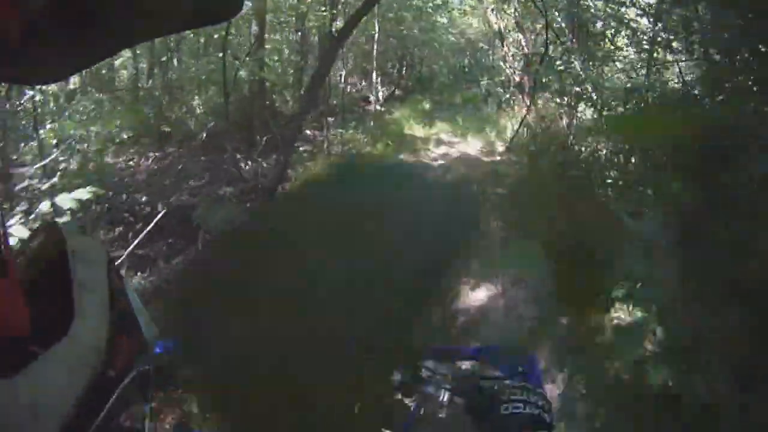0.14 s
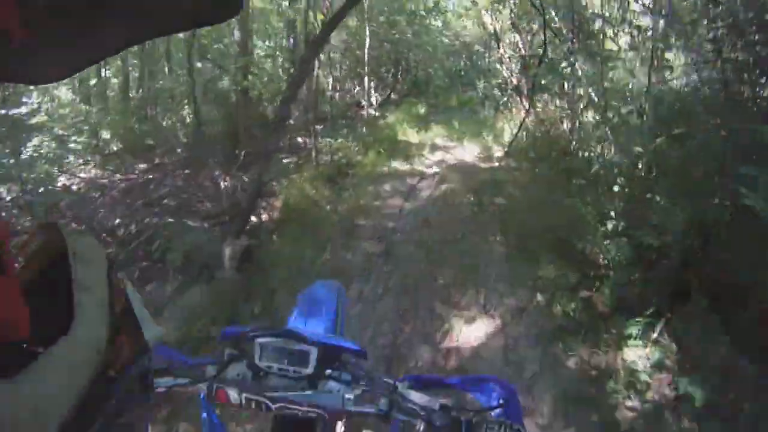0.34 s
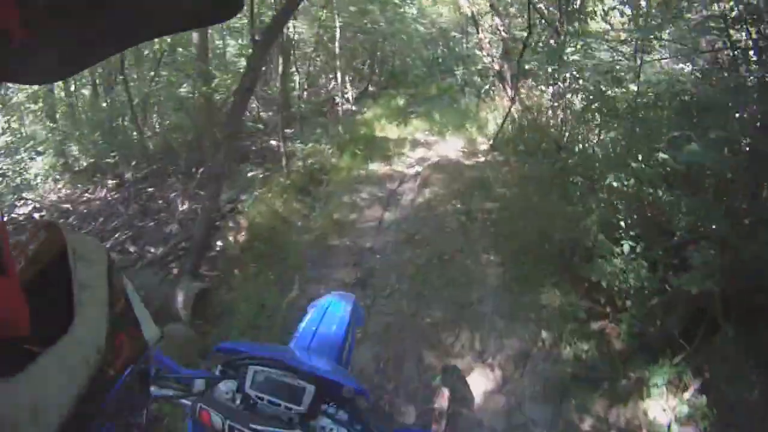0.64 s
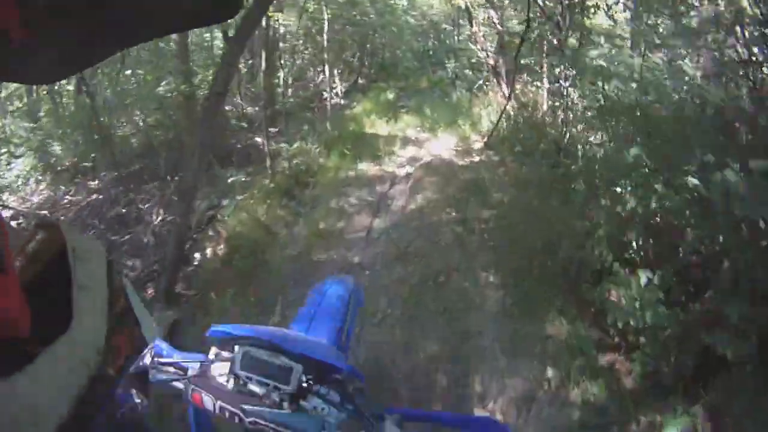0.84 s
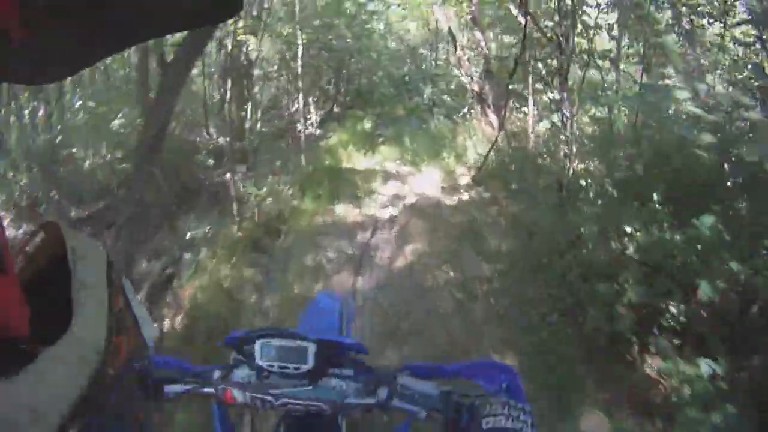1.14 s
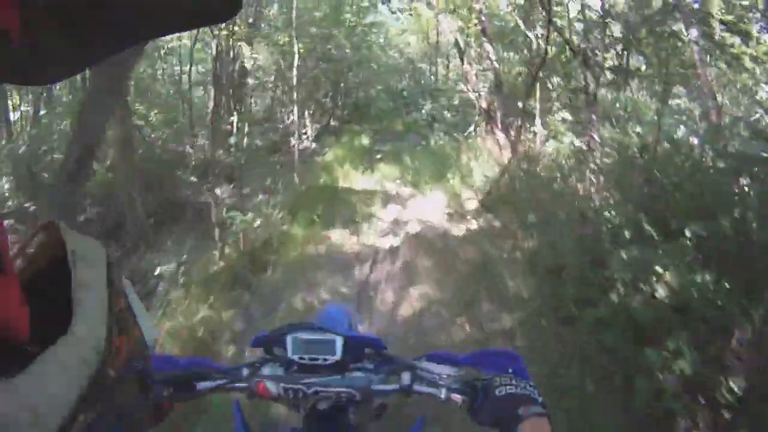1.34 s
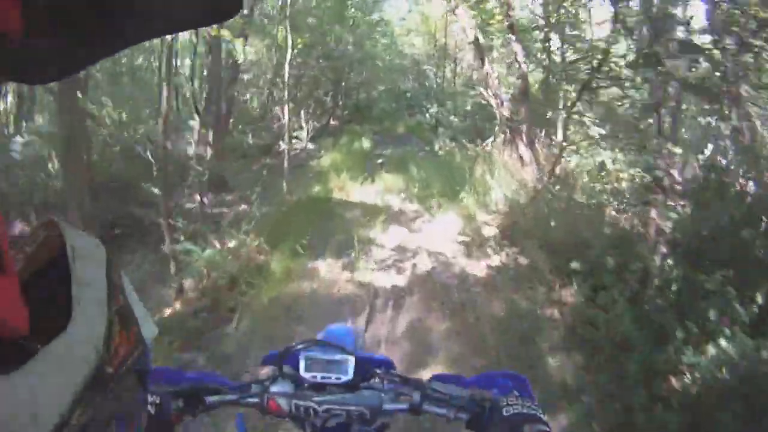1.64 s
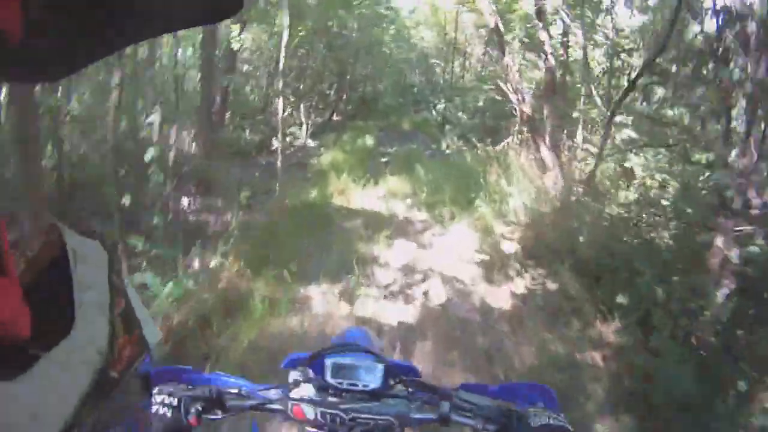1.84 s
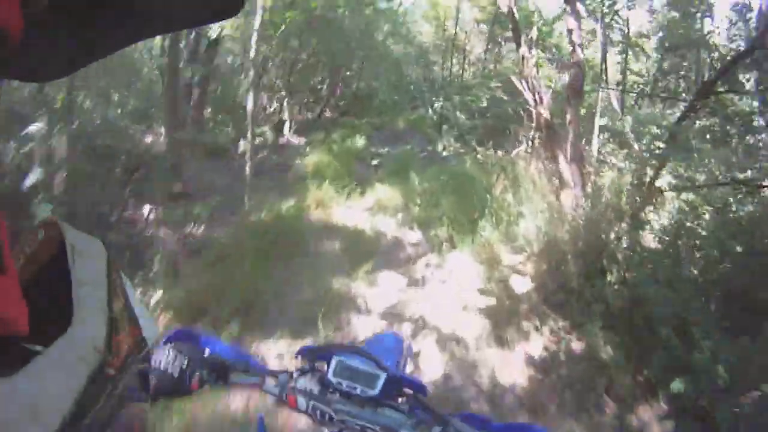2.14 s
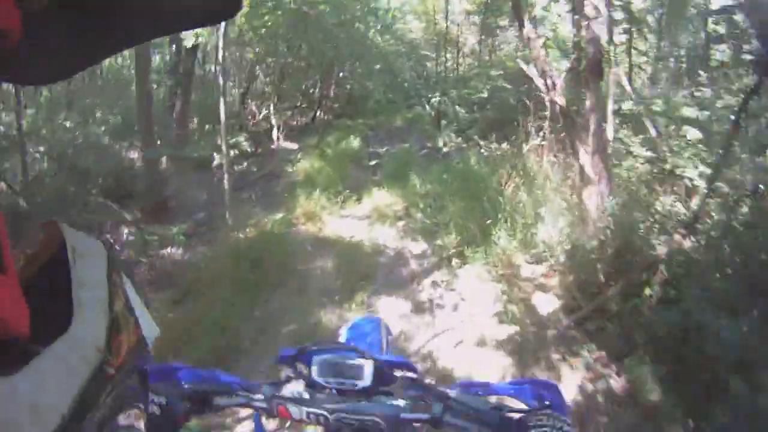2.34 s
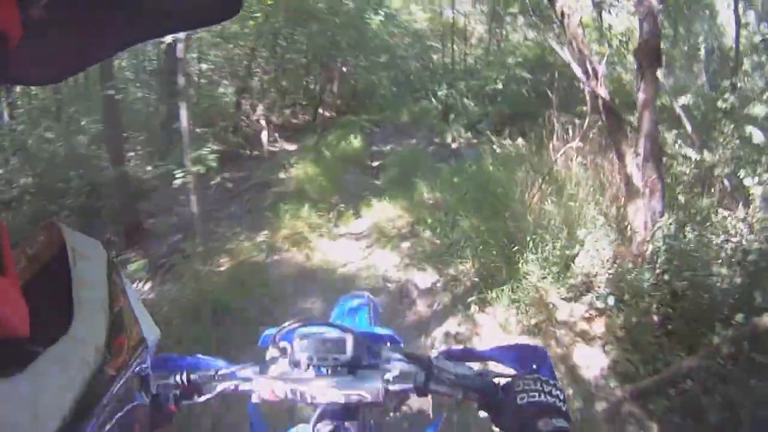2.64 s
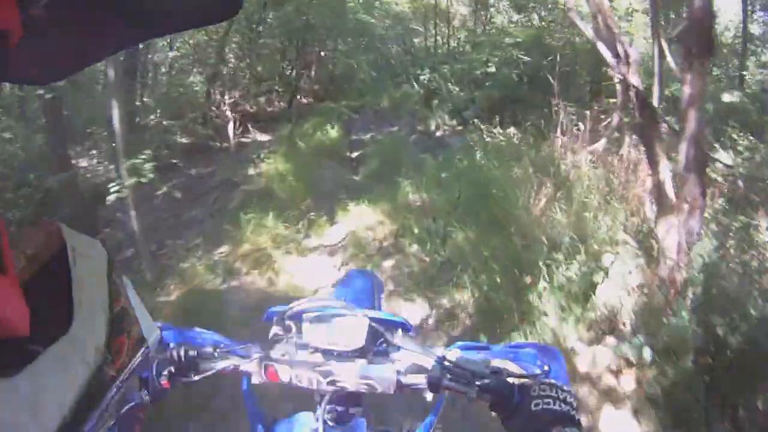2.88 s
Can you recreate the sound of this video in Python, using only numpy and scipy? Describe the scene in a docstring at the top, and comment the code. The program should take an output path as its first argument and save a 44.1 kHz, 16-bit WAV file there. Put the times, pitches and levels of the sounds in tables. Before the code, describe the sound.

A dirt bike engine, heard close at the rider's helmet on a wooded trail: hard plastic knocks, a quick overloaded rev, then a fall to a slow putter with missed beats and faint brake hiss.

```python
"""A single-cylinder four-stroke dirt bike on a forest trail, heard by a microphone at the rider's helmet.
First the chassis clatters over a bump in noise bursts, as the throttle opens and the airbox rings.
The loud part overloads the microphone: each firing rings the silencer and echoes in the exhaust pipe.
Then the engine sinks to a putter and misses a few firings, while a narrow band of noise hisses at the brake.
Noise for gas rasp, engine clatter and tyre rumble runs throughout; short dull bumps (decaying sines) and
bright swishes of brush (noise swells) come both early and late."""
import sys
import numpy as np
from scipy import signal
from scipy.fft import rfft, irfft
from scipy.io import wavfile
from scipy.ndimage import uniform_filter1d

SR = 44100
rng = np.random.default_rng(int(sys.argv[2]) if len(sys.argv) > 2 else 0)


def dump(signal):
    """Clip the signal to [-1, 1] and save it as 16-bit WAV at the path in sys.argv[1]."""
    limited = np.clip(np.atleast_2d(signal).T, -1, 1)
    pcm = np.round(limited * 32767).astype(np.int16)
    wavfile.write(sys.argv[1], SR, pcm)


N = 132741
TIME = np.arange(N) / SR


def from_db(db):
    """Decibels to gain."""
    return 10 ** (np.asarray(db) / 20)


def curve(rows, at=TIME):
    """The columns of a control curve, interpolated at the given times."""
    start_s, *columns = np.transpose(rows)
    return [np.interp(at, start_s, column) for column in columns]


def clicks(times, sizes):
    """A train of single-sample impulses, over a tiny offset far below hearing."""
    positions = np.maximum(times * SR, 0).astype(int)
    return np.bincount(positions, sizes, N)[:N] + 1e-18


def ring(x, hz, t60):
    """A unit click sets a sine of height 1 ringing, which falls 60 dB in t60 seconds."""
    radius = from_db(-60 / (t60 * SR))
    angle = 2 * np.pi * hz / SR
    return signal.lfilter([0, np.sin(angle)], [1, -2 * radius * np.cos(angle), radius ** 2], x)


def fade(x, decay_s):
    """Each click becomes an exponential decay."""
    return signal.lfilter([1], [1, -np.exp(-1 / (decay_s * SR))], x)


# hollow resonances around the microphone: centre_hz [Hz], width_hz [Hz], boost_db [dB]
HOLLOW_RESONANCES = [(1440, 110, 8), (1857, 43, 8), (3085, 69, 9), (4750, 150, 4), (5870, 490, 6.5)]


def noise(colour):
    """Noise of the given colour, heard through the hollow resonances; rms 1."""
    hz = np.fft.rfftfreq(N, 1 / SR) + 1  # the offset keeps the logarithm finite
    point_hz, point_db = np.transpose(colour)
    gain_db = np.interp(np.log(hz), np.log(point_hz), point_db)
    for centre_hz, width_hz, boost_db in HOLLOW_RESONANCES:
        gain_db = gain_db + boost_db / (1 + (2 * (hz - centre_hz) / width_hz) ** 2)
    x = irfft(rfft(rng.standard_normal(N)) * from_db(gain_db), N)
    return x / x.std()


# crank speed: start_s [s], speed_rpm [revolutions per minute]
CRANK_SPEED = [(0.0, 2086), (0.153, 2391), (0.418, 5474), (0.521, 6039), (0.655, 5859), (0.881, 4474),
               (1.01, 3995), (1.138, 3725), (1.335, 3459), (1.36, 3169), (1.463, 1965), (1.511, 2143),
               (1.76, 2101), (1.799, 2006), (1.968, 2336), (2.167, 2234), (2.303, 2106), (2.433, 2302),
               (2.577, 1954), (2.613, 2352), (2.754, 2211), (3.01, 2250)]
# weak or missed firings, each given to the nearest firing: start_s [s], loss_db [dB]
WEAK_FIRINGS = [(1.407, -5), (1.459, -11), (1.573, -8.5), (2.019, -3.5), (2.071, -3.5), (2.177, -4),
                (2.232, -18)]
FIRST_FIRING_CYCLES = .245


def crank():
    """Engine cycles gone by (two turns each), the firing times and how much each falls short in dB."""
    cycles = np.cumsum(curve(CRANK_SPEED)[0]) / (120 * SR) - FIRST_FIRING_CYCLES
    times = np.interp(np.arange(int(cycles[-1]) + 1), cycles, TIME)
    loss_db = np.zeros(len(times))
    for start_s, db in WEAK_FIRINGS:
        loss_db[np.argmin(abs(times - start_s))] = db
    return cycles, times, loss_db


# strength of the firings: start_s [s], level_db [dB]
FIRING_STRENGTH = [(0, -3), (.12, 1), (.22, 4.5), (.29, 5), (.38, 0.5), (.55, 1.5), (.76, -1), (.95, 3),
                   (1.12, 5), (1.31, 4.5), (1.38, -2.5), (1.55, -0.5), (1.76, -4.5), (1.88, -1.5),
                   (2.28, -3.5), (2.4, 0.5), (2.51, 0), (2.62, 1), (3, 2)]
# hot gas shortens the echo in the pipe, load sharpens the pulse:
# start_s [s], round_trip_ms [ms], bark_db [dB]
PIPE_STATE = [(0, 7, -13), (.25, 6.6, 0), (.48, 4.57, 9.5), (.7, 4.85, 10.5), (.95, 6.35, -0.5),
              (1.33, 6.37, -4), (1.6, 6.6, -15), (3, 6.88, -10.5)]
# silencer modes of the thump: pitch_hz [Hz], level_db [dB], t60_s [s]
THUMP_MODES = [(105, -31, .028), (292, -9.3, .0195), (465, -13, .0125)]
# silencer modes of the sharper bark: pitch_hz [Hz], level_db [dB], t60_s [s]
BARK_MODES = [(500, -20, .013), (635, -16, .015), (760, -17, .015), (895, -17, .016), (1000, -18, .016),
              (1150, -17, .013), (1300, -18, .013), (1450, -16, .018)]
THUMP_SOFT_HZ, BARK_SOFT_HZ = 600, 1600  # low-pass edges
# first echo as a share of the blast, its rise per dB of bark, and the gain from each echo to the next
ECHO_SHARE, ECHO_PER_BARK_DB, ECHO_LOSS = .8, .022, .3


def silencer(times, level_db, modes, soft_hz, polarity, trip_s, echo, echoes=3):
    """Blasts and their pipe echoes ring the silencer modes, which radiate the change of flow."""
    flow = np.zeros(N)
    for order, (hz, mode_db, t60) in enumerate(modes):
        uneven_db = .6 * rng.standard_normal(len(times))
        size = from_db(level_db + mode_db + uneven_db)
        blasts = clicks(times, size)
        for k in range(echoes):
            blasts = blasts + clicks(times + (k + 1) * trip_s, size * echo * ECHO_LOSS ** k)
        flow += polarity ** order * ring(blasts, hz, t60) / (2 * np.pi * hz)
    pressure = np.gradient(flow) * SR
    return signal.sosfilt(signal.butter(2, soft_hz, fs=SR, output="sos"), pressure)


def exhaust(times, loss_db):
    """Each blast runs up and down the pipe; the silencer answers with a thump and a sharper bark."""
    level_db = curve(FIRING_STRENGTH, times)[0] + loss_db
    trip_ms, bark_db = curve(PIPE_STATE, times)
    trip_s = trip_ms / 1000
    echo = ECHO_SHARE + ECHO_PER_BARK_DB * bark_db
    thump = silencer(times, level_db, THUMP_MODES, THUMP_SOFT_HZ, 1, trip_s, echo)
    # neighbouring bark modes ring in opposite polarity
    bark = silencer(times, level_db + bark_db, BARK_MODES, BARK_SOFT_HZ, -1, trip_s, echo)
    return -(thump + bark)


# airbox modes at full load: pitch_hz [Hz], level_db [dB], t60_s [s]
AIRBOX_MODES = [(400, -25, .025), (720, -19, .022), (905, -19, .026), (1000, -20, .026), (1140, -21, .02)]
INTAKE_LAG_CYCLES = 0.48  # after each firing
INTAKE_FOLLOWS = 0.93  # dB of gulp per dB of exhaust bark


def intake(cycles):
    """The cylinder gulps air shortly after the exhaust stroke; load makes the airbox ring."""
    times = np.interp(np.arange(int(cycles[-1])) + INTAKE_LAG_CYCLES, cycles, TIME)
    load_db = curve(PIPE_STATE, times)[1]
    gulps = clicks(times, from_db(INTAKE_FOLLOWS * (load_db - load_db.max())))
    out = np.zeros(N)
    for order, (hz, db, t60) in enumerate(AIRBOX_MODES):
        out += (-1) ** order * from_db(db) * ring(gulps, hz, t60)
    return out


# gas rushing out of the silencer: start_s [s], level_db [dB]
RASP_LEVEL = [(0, -22.5), (.14, -22), (.22, -12.5), (.35, -12), (.62, -11), (.85, -15), (1.1, -18),
              (1.33, -18.5), (1.43, -24), (1.75, -24.5), (1.95, -25), (2.15, -27), (2.35, -26.5),
              (2.6, -21.5), (3, -22)]
# its colour: pitch_hz [Hz], level_db [relative dB]
RASP_SPECTRUM = [(100, -23), (200, -16), (330, -8), (600, -7), (1000, -4), (1400, 1), (1850, -2.5),
                 (2200, -11), (4000, -15), (6000, -16), (10000, -34), (16000, -40)]
RASP_DELAY_S, RASP_DECAY_S = 0.0051, 0.0071
RASP_STEADY = 0.79  # steady rush beside puffs of about 1


def rasp(times, loss_db):
    """A puff of turbulent gas follows each firing, over a steady rush."""
    size = from_db(loss_db + 1.5 * rng.standard_normal(len(times)))
    puffs = fade(clicks(times + RASP_DELAY_S, size), RASP_DECAY_S)
    gate = RASP_STEADY + uniform_filter1d(puffs, size=120)
    gate = gate / np.sqrt(uniform_filter1d(gate ** 2, size=6000))  # even out the running rms
    return from_db(curve(RASP_LEVEL)[0]) * gate * noise(RASP_SPECTRUM)


# valve gear, piston and chain, before the CLATTER_DB trim: start_s [s], level_db [dB]
CLATTER_LEVEL = [(0, -27), (.12, -20.5), (.3, -15.5), (.45, -10.5), (.64, -8), (.85, -10.5), (1.07, -12.5),
                 (1.33, -18.5), (1.5, -26), (1.75, -26.5), (1.98, -23), (2.14, -27.5), (2.35, -27),
                 (2.56, -25), (2.7, -25), (2.85, -24.5), (3, -24)]
# their colour: pitch_hz [Hz], level_db [relative dB]
CLATTER_SPECTRUM = [(120, -43), (300, -16.5), (900, 3), (1400, 0.5), (2300, -6.5), (3200, 1.5),
                    (4000, -1.5), (5200, 2), (6100, -0.5), (6800, -7), (7800, -6), (9500, -21),
                    (12000, -22), (15500, -25)]
CLATTER_DB, CLATTER_ROUGH_DB = -.5, 1.5  # trim and rms of the random flutter
CLATTER_SWING, CLATTER_LAG_CYCLES = 0.13, 0.19  # depth of the swell and its peak after each firing


def clatter(cycles):
    """Dense metallic noise that swells once in each engine cycle."""
    grain = uniform_filter1d(rng.standard_normal(N), size=70)
    rough = from_db(CLATTER_ROUGH_DB * grain / grain.std())
    swell = 1 + CLATTER_SWING * np.cos(2 * np.pi * (cycles - CLATTER_LAG_CYCLES))
    gate = rough * swell
    gate = gate / np.sqrt(np.mean(gate ** 2))
    return from_db(CLATTER_DB + curve(CLATTER_LEVEL)[0]) * gate * noise(CLATTER_SPECTRUM)


# chassis knocks: start_s [s], level_db [dB]
CHASSIS_KNOCKS = [(0.031, 3), (0.04, -2.5), (0.0453, -6), (.0585, -7), (0.0778, -2.5), (0.156, -9),
                  (0.18, -4), (.187, -4.5), (.209, -6), (0.24, 1.5), (0.248, -4), (0.259, -12), (0.275, -1),
                  (0.278, -5), (.34, 1), (0.358, -11), (2.405, -16)]
# their colour: pitch_hz [Hz], level_db [relative dB]
KNOCK_SPECTRUM = [(200, -47), (700, -6), (1200, 2.5), (1600, 7.5), (2300, -2.5), (3500, -9), (6000, -22),
                  (10000, -29.5), (16000, -54)]
KNOCK_DECAY_S, KNOCK_TAIL_S, KNOCK_TAIL_DB = 0.0017, 0.018, -13.5


def knocks():
    """Hard plastic knocks: noise bursts that die at once, each with a short weaker tail."""
    start_s, level_db = np.transpose(CHASSIS_KNOCKS)
    hits = clicks(start_s, from_db(level_db))
    tail = from_db(KNOCK_TAIL_DB) * fade(hits, KNOCK_TAIL_S)
    return (fade(hits, KNOCK_DECAY_S) + tail) * noise(KNOCK_SPECTRUM)


# dull bumps, the first one the ringing body of the chassis knock at 0.04 s: start_s [s], pitch_hz [Hz],
# level_db [dB], t60_s [s]
DULL_BUMPS = [(.0415, 800, -6, .025), (2.211, 730, -20, .04), (2.220, 850, -13, .028)]


def bumps():
    """Each dull bump is one decaying sine; the first gives the knock at 0.04 s its ringing body."""
    out = np.zeros(N)
    for start_s, hz, db, t60 in DULL_BUMPS:
        out += ring(clicks(np.array([start_s]), from_db([db])), hz, t60)
    return out


# bright swishes of brush against the bike: middle_s [s], half_length_s [s], level_db [dB]
BRUSH_SWISHES = [(0.176, 0.01, -16), (0.362, 0.014, -9), (1.997, 0.039, -29), (2.245, 0.02, -22),
                 (2.664, 0.014, -21), (2.736, 0.011, -20), (2.953, .009, -22)]
# their colour: pitch_hz [Hz], level_db [relative dB]
BRUSH_SPECTRUM = [(1000, -3.5), (3800, 1.5), (6000, 0.5), (8000, -6), (10500, -18.5), (16000, -22)]


def brush():
    """Brush sweeps the bike: bright noise that swells and sinks in a smooth bell-shaped curve."""
    swish = np.zeros(N)
    for middle_s, half_s, db in BRUSH_SWISHES:
        swish += from_db(db) * np.exp(-((TIME - middle_s) / half_s) ** 2)
    return swish * noise(BRUSH_SPECTRUM)


# the brake disc hisses faintly as the bike slows: start_s [s], level_db [dB]
BRAKE_LEVEL = [(1.25, -65), (1.42, -30), (1.75, -31.5), (2.0, -34), (2.2, -60)]
# its colour: pitch_hz [Hz], level_db [relative dB]
BRAKE_SPECTRUM = [(4000, -30), (4750, -7), (5080, 0), (5600, -7), (6500, -30)]


def brake():
    """Pads rubbing on the disc: a narrow, high hiss."""
    return from_db(curve(BRAKE_LEVEL)[0]) * noise(BRAKE_SPECTRUM)


# colour of the tyre rumble: pitch_hz [Hz], level_db [relative dB]
ROLLING_SPECTRUM = [(30, -30), (70, 13), (150, -5), (300, -2), (700, -2.5), (1200, -48), (3000, -37)]


def rolling():
    """Tyres on the dirt: a soft, steady rumble."""
    return from_db(-44) * noise(ROLLING_SPECTRUM)


def scene():
    """Engine, chassis, brush, brake and tyres, at a fixed distance from the rider."""
    cycles, times, loss_db = crank()
    noisy = rasp(times, loss_db) + clatter(cycles) + knocks() + bumps() + brush() + brake()
    # these layers carry little bass below 220 Hz
    noisy = signal.sosfilt(signal.butter(2, 220, "high", fs=SR, output="sos"), noisy)
    return (exhaust(times, loss_db) + intake(cycles) + noisy + rolling())[None]


OVERLOAD = 1.0  # largest level the microphone passes
TOP_STOP_HZ = 16100  # 60 dB down from here up


def record(dry):
    """The microphone clips the peaks, then the deep bass and the top are cut."""
    clipped = np.clip(dry, -OVERLOAD, OVERLOAD)
    thinned = signal.sosfilt(signal.butter(1, 42, "high", fs=SR, output="sos"), clipped)
    return signal.sosfilt(signal.cheby2(16, 60, TOP_STOP_HZ, fs=SR, output="sos"), thinned)


dry = scene()
out = record(dry)
dump(out)
```